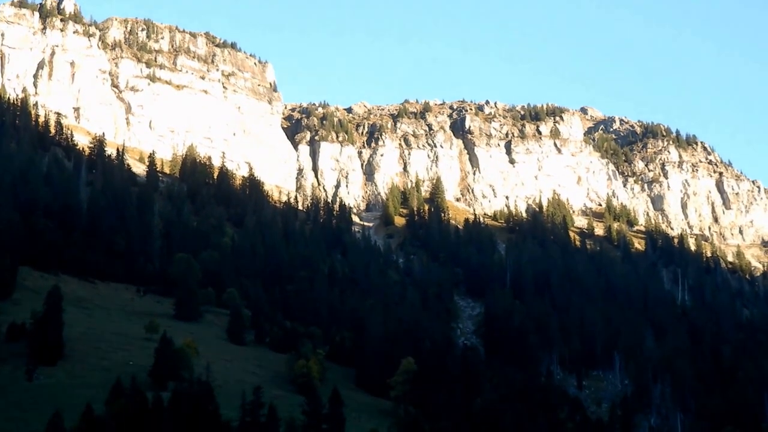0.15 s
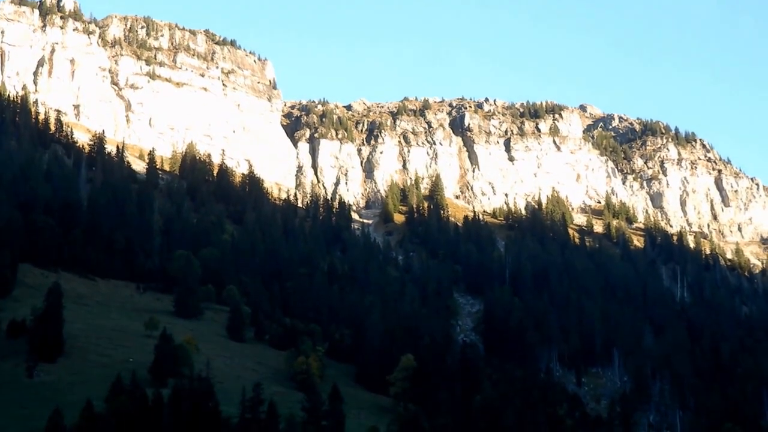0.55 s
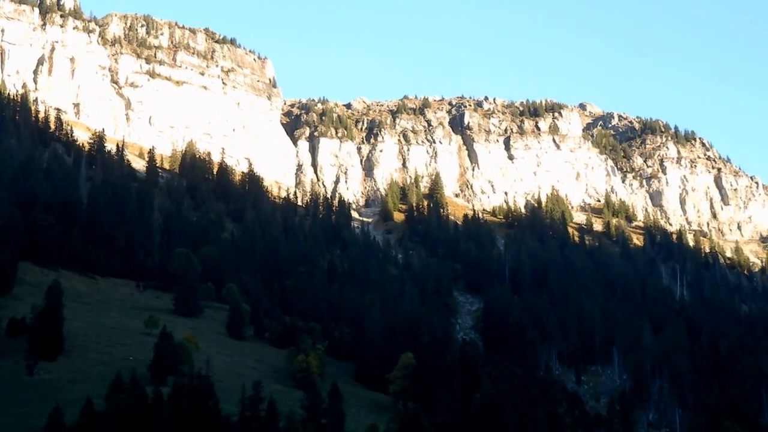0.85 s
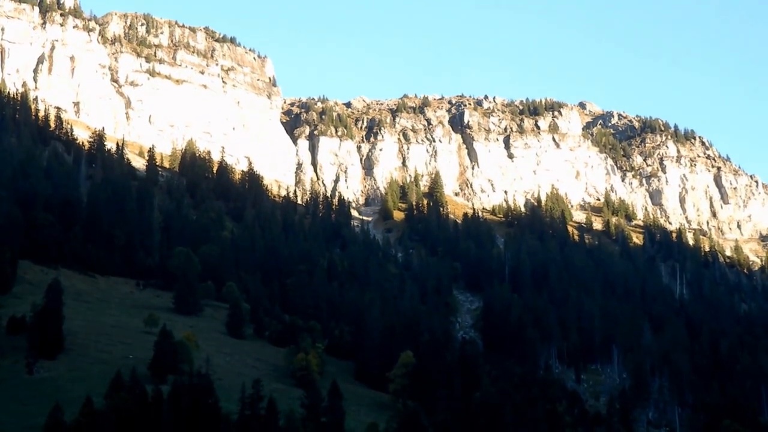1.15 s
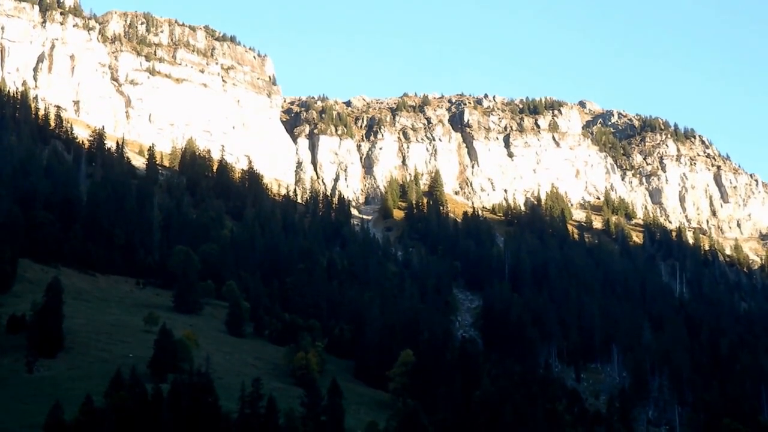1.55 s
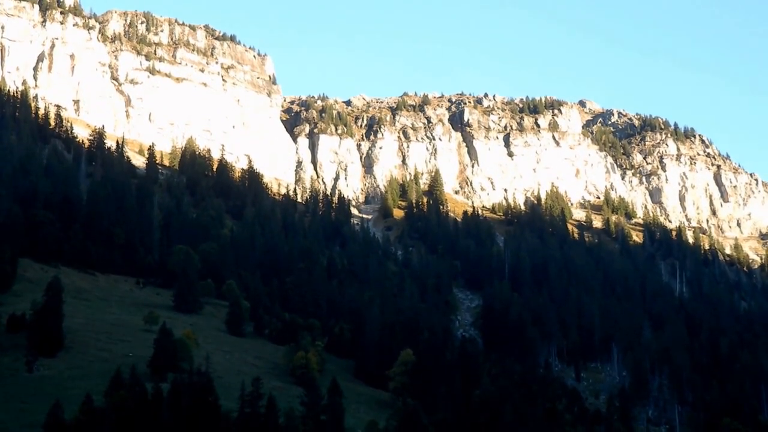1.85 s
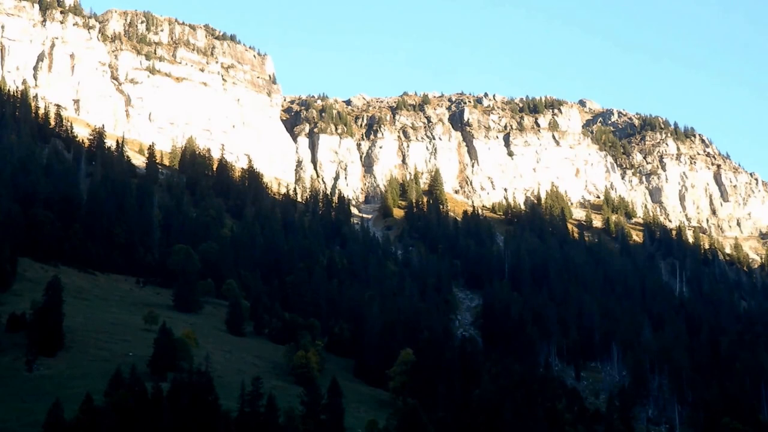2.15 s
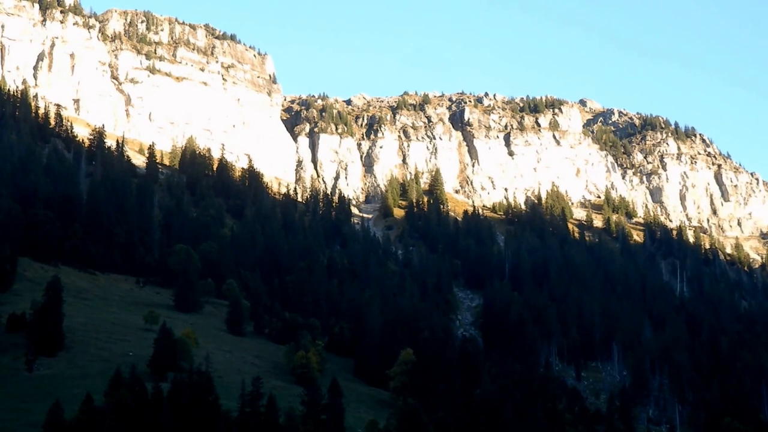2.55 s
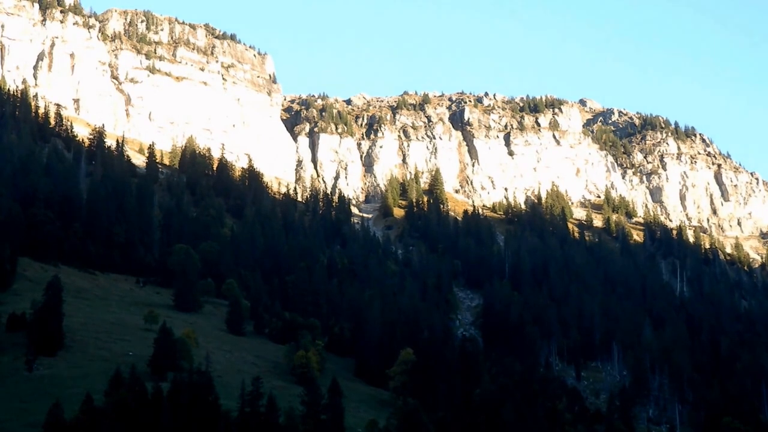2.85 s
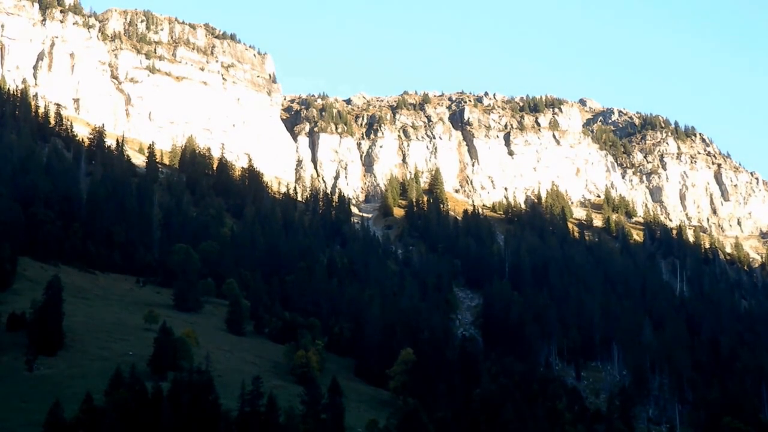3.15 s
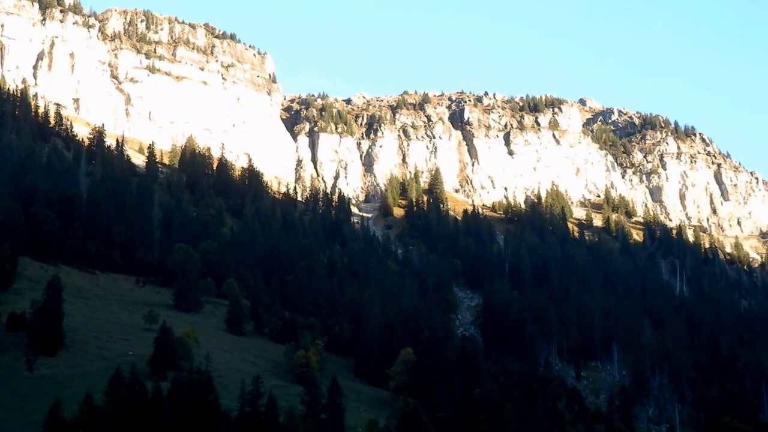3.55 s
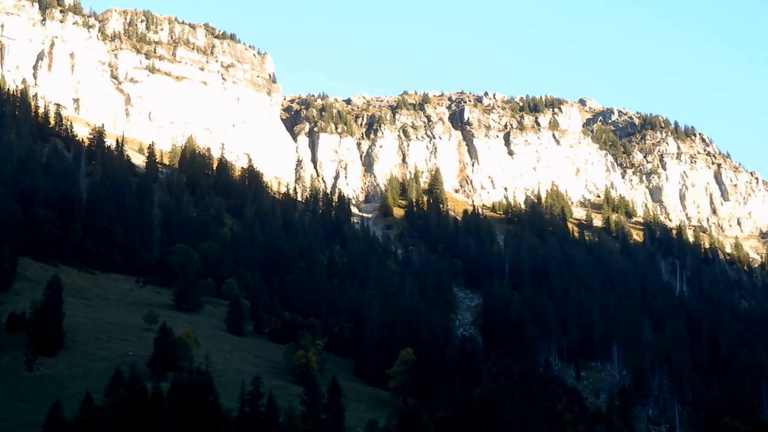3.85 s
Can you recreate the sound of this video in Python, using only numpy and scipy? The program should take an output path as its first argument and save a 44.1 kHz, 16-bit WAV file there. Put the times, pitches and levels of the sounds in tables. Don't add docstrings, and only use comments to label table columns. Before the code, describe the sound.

Wind buffeting a hand-held microphone, mostly on the right, with distant stags bellowing across a valley

```python
import sys
import numpy as np
from scipy import signal
from scipy.fft import rfft, irfft
from scipy.io import wavfile
from scipy.ndimage import uniform_filter1d

SR = 44100
rng = np.random.default_rng(int(sys.argv[2]) if len(sys.argv) > 2 else 0)


def to_wav(sig):
    pcm = np.clip(np.atleast_2d(sig), -1, 1) * 32767
    pcm = np.round(pcm).astype(np.int16)
    wavfile.write(sys.argv[1], SR, pcm.T)


def ratio_of_db(decibels):
    return 10 ** (np.asarray(decibels, float) / 20)


N = 176400


def curve(table, col):
    a = np.array(table, float)
    return np.interp(np.arange(N) / SR, a[:, 0], a[:, col])


def unit(x):
    return x / np.sqrt(np.mean(x ** 2) + 1e-30)


def colour(x, points):
    a = np.array(points, float)
    log_hz = np.log(np.arange(N // 2 + 1) * SR / N + 1)
    log_points = np.log(a[:, 0])
    outside = np.maximum(log_points[0] - log_hz, 0) + np.maximum(log_hz - log_points[-1], 0)
    gain_db = np.interp(log_hz, log_points, a[:, 1]) - 24.4 * outside
    return irfft(rfft(x) * ratio_of_db(gain_db), N)


def band(x, hz, width):
    return signal.lfilter(*signal.iirpeak(hz, hz / width, SR), x)


def above(x, hz):
    return irfft(rfft(x) * (np.arange(N // 2 + 1) * SR / N > hz), N)


def walk(rate):
    k = int(SR / rate)
    steps = np.repeat(rng.standard_normal(N // k + 1), k)
    return unit(uniform_filter1d(uniform_filter1d(steps, k), k)[:N])


def add(out, s, shape):
    i = int(s * SR) - len(shape) // 2
    a, b = max(i, 0), min(i + len(shape), N)
    out[a:b] += shape[a - i:b - i]


def bed(points, alike, flicker_db, swell_db):
    n = rng.standard_normal((3, N))
    swell = walk(3.02)
    noise = alike * n[0] + np.sqrt(1 - min(alike, .99) ** 2) * n[1:]
    spec = rfft(unit(colour(noise, points)))
    octave = np.log2(np.arange(N // 2 + 1) * SR / N + 1)
    lo, hi = int(np.log2(points[0][0])), int(np.log2(points[-1][0])) + 2
    out = 0
    for c in range(lo, hi):
        share = np.interp(octave, [c - 1, c, c + 1], [c == lo, 1, c == hi - 1])
        out = out + irfft(spec * share, N) * ratio_of_db(swell_db * swell + flicker_db * walk(9.0))
    return out


# frequency in Hz, level in dB per Hz.
HISS_COLOUR = [(1200, -7), (2000, -8.5), (2600, -9.5), (3600, -13.5), (5000, -13), (6400, -4), (10000, -4),
               (15600, -2)]


def hiss():
    return ratio_of_db(-58.5) * bed(HISS_COLOUR, alike=0.071, flicker_db=.2, swell_db=.3)


# frequency in Hz, level in dB.
SCAN_TONES = [
    (15734, -74),
    (7882, -88),
]


def scan_whine():
    t = np.arange(N) / SR
    return sum(ratio_of_db(db + 3.5) * np.sin(2 * np.pi * hz * t) for hz, db in SCAN_TONES)


# frequency in Hz, level in dB per Hz.
AIR_COLOUR = [(60, -7.5), (160, -4), (220, -4.5), (400, -4.5), (550, -10.5), (800, -20), (1300, -32),
              (2500, -42.5)]
# time in seconds, level in dB.
SLOPE_SWELL = [(0, 2.5), (1.4, 0.5), (1.6, -2), (2.1, 0.5), (2.9, 1.5), (3.3, -2.5), (4, 1)]


def valley_air():
    return ratio_of_db(-50 + curve(SLOPE_SWELL, 1)) * bed(AIR_COLOUR, alike=0.98, flicker_db=1.3, swell_db=.4)


# time in seconds, level in dB.
GRASS_RUSTLE = [(2.0, -77), (2.3, -60), (2.47, -59), (2.57, -57.5), (2.64, -55), (2.7, -59), (2.76, -57),
                (2.82, -61), (2.92, -65), (3.0, -75), (3.4, -62.5), (3.65, -68), (4, -65.5)]
# frequency in Hz, level in dB per Hz.
GRASS_COLOUR = [(700, -2.5), (1100, -2), (2000, -3.5), (3600, -10), (6500, -7.5), (10000, -14),
                (15000, -17)]


def grass():
    return bed(GRASS_COLOUR, alike=.4, flicker_db=1.2, swell_db=.3) * ratio_of_db(curve(GRASS_RUSTLE, 1))


# time in seconds, level in dB, pitch in Hz.
HOUSING_TICKS = [(0.194, -61, 6000), (1.389, -51, 950), (1.6624, -51, 2120), (1.663, -56.5, 6000),
                 (1.889, -60, 5800), (2.3105, -63, 7140), (2.3218, -44.5, 2150), (2.3227, -60.5, 5500),
                 (2.346, -60, 7000), (2.757, -58, 8000), (3.575, -61, 6030), (3.8833, -58.5, 7600),
                 (3.998, -47, 1800)]


def ticks():
    t60_s = 0.024
    out, t = np.zeros((2, N)), np.arange(-900, 900) / SR
    for s, db, hz in HOUSING_TICKS:
        n = rng.standard_normal((3, len(t)))
        burst = (n[0] + n[1:]) * (t > 0) * ratio_of_db(db + 6 - 60 * np.abs(t) / t60_s)
        y = 1.4 * band(band(burst, hz, .7 * hz), hz, 1.3 * hz)
        y = y - 0.6 * band(y, 4300, 1700)
        add(out[0], s, y[0])
        add(out[1], s, y[1])
    return out


# time in seconds, length in seconds, level in dB, pitch in Hz.
STAG_GRUNTS = [
    (.70, .05, -46, 158),
    (.82, .035, -53, 162),
    (.93, .03, -54, 156),
    (1.066, .035, -49, 160),
    (1.33, .04, -52, 140),
    (1.43, .055, -51, 138),
]


def grunts():
    out = np.zeros(N)
    for s, length, db, hz in STAG_GRUNTS:
        u = np.arange(-int(length * SR), int(length * SR)) / SR
        swell = np.exp(-2 * (u / length * 1.33) ** 2)
        add(out, s, ratio_of_db(db + 11.5) * swell * np.sin(2 * np.pi * hz * u * (1 - 0.15 * u)))
    return out


# time in seconds, pitch in Hz, level in dB,
# extra level in dB of the third resonance, which falls as the mouth opens.
FIRST_BELLOW = [(0, 82.76, -50, -1), (.08, 80.35, -43, -6), (.17, 80.7, -44, 7), (.25, 80.16, -46, -2),
                (.33, 75.6, -41.5, -2.5), (.44, 74.1, -43.5, -2.5), (.55, 70.37, -37.5, -13),
                (.66, 64.75, -39, -13), (.76, 62, -57, 12)]
SECOND_BELLOW = [(2.05, 66.88, -56, -4), (2.16, 68, -50, -0.5), (2.33, 66.9, -43, -5.5),
                 (2.5, 65.74, -45.5, 3), (2.62, 64.6, -41.5, -4), (2.72, 63.7, -40, -3),
                 (2.8, 63.1, -42.5, -10), (2.9, 61.8, -56, -9)]
# resonance in Hz, its width in Hz, level in dB.
FIRST_THROAT = [(156, 52, -10.5), (260, 87, -9), (404.5, 63, 4), (494, 74, -4.5)]
SECOND_THROAT = [(170, 56, -33), (341, 92, -5), (419.7, 55, 3.5), (536.5, 33, -4), (870, 115, -22),
                 (1243, 74, -19.5)]


def bellow(table, throat, rasp):
    t = np.arange(N) / SR
    cycles = np.cumsum(curve(table, 1) * (1 + .004 * walk(25))) / SR
    pulses = np.diff(np.floor(cycles), prepend=0) * ratio_of_db(2.0 * walk(60))
    puffs = np.exp(-(cycles % 1) / 0.24) * rng.standard_normal(N)
    source = unit(pulses) + rasp * unit(puffs)
    voice = 0
    for k, (hz, width, db) in enumerate(throat):
        ring = unit(band(band(source, hz, width), hz, width))
        mouth_db = curve(table, 3) if k == 2 else 0
        voice = voice + (-1) ** k * ratio_of_db(db + mouth_db) * ring
    start, end = table[0][0], table[-1][0]
    gate = np.clip((t - start + 0.022) / 0.018, 0, 1) * np.clip((end - t) / 0.022, 0, 1)
    return voice * ratio_of_db(curve(table, 2) - 5.5) * gate


def valley(x):
    t60_s, wet_db = .8, -9
    t = np.arange(SR) / SR
    n = rng.standard_normal((3, len(t)))
    tail = (n[0] + 0.086 * n[1:]) * ratio_of_db(-60 * t / t60_s) * (t > .015)
    tail = tail / np.sqrt(np.sum(tail[0] ** 2))
    return x + ratio_of_db(wet_db) * signal.fftconvolve(x[None], tail, axes=1)[:, :N]


def stags():
    first = bellow(FIRST_BELLOW, FIRST_THROAT, rasp=.3)
    second = bellow(SECOND_BELLOW, SECOND_THROAT, rasp=.5)
    return ratio_of_db(-2) * valley(first + second + grunts())


def eddy(hz, turn):
    sharp = 4.24
    u = np.arange(-int(2 * SR / hz), int(2 * SR / hz)) * hz / SR
    y = np.real(np.exp(2j * np.pi * turn) / (1 - 2j * np.pi * u / (sharp - 1)) ** sharp)
    return y * np.hanning(len(u))


def wind(big, level_db, hz):
    small, thumps, wake = np.zeros(N), np.zeros(N), np.zeros(N)
    for place, pitch, rarity, turn in rng.random((700, 4)):
        level = ratio_of_db(-np.log(rarity + 0.0081))
        add(small, place * N / SR, level * eddy(hz * np.exp(0.4 * 3 * (pitch - .5)), turn))
    wake_s = 0.025
    u = np.arange(-4000, 4000) / SR
    for s, db, f in big:
        add(thumps, s, ratio_of_db(db + 0.5) * eddy(f * 1.037, rng.random()))
        add(wake, s, ratio_of_db(db - 14) ** 2 * np.exp(-(u / wake_s) ** 2))
    out = thumps + unit(small) * np.sqrt(ratio_of_db(level_db) ** 2 + wake)
    limit = 1.6
    port_hz = [26.3, 424]
    port = signal.butter(2, port_hz, "band", fs=SR, output="sos")
    return signal.sosfiltfilt(port, limit * np.tanh(out / limit))


# time in seconds, level in dB.
LEFT_RUMBLE = [(0, -40), (.25, -41), (.45, -42.5), (1.3, -48), (1.82, -50), (1.92, -38.5), (2.3, -38),
               (2.75, -41), (2.95, -44), (3.3, -42), (3.5, -50), (3.82, -46), (3.95, -40)]
RIGHT_RUMBLE = [(0, -44), (.3, -36), (.45, -52.5), (.9, -48.5), (1.1, -59), (1.2, -41.5), (1.45, -35.5),
                (1.65, -44), (1.85, -44), (1.95, -38.5), (2.3, -33.5), (2.6, -31), (2.88, -47), (3.14, -52),
                (3.3, -38), (3.5, -33), (4, -34.5)]
# time in seconds, level in dB, pitch in Hz.
LEFT_HITS = [(0.073, -26, 50), (0.178, -30, 43), (0.285, -32, 43), (1.979, -44, 40), (2.015, -27, 58),
             (2.043, -28, 69), (2.196, -29, 59), (2.252, -22.5, 47), (2.406, -29.0, 40), (2.505, -30.5, 54),
             (2.631, -32.5, 40), (2.708, -31, 63), (3.111, -35, 43), (3.14, -28, 74), (3.276, -30, 40.3),
             (3.352, -26.5, 50), (3.868, -32, 40), (3.94, -33, 40), (3.963, -33.0, 40), (3.982, -30, 50)]
RIGHT_HITS = [(0.093, -15.5, 64.3), (0.11, -16.5, 46.6), (0.133, -20, 43), (0.178, -16.5, 43),
              (0.207, -14.5, 80), (0.362, -16.5, 51), (0.508, -23.5, 59.4), (0.606, -26, 54.2),
              (0.626, -28, 43), (0.807, -21, 108.2), (0.823, -22.5, 59), (0.84, -25, 53),
              (1.192, -23.5, 54), (1.219, -22.5, 43), (1.307, -19, 78), (1.33, -24, 54), (1.385, -15.5, 81),
              (1.4, -19.5, 74), (1.594, -23, 57), (1.901, -19.0, 57), (1.923, -14, 67), (1.967, -15, 58),
              (2.015, -9.5, 67), (2.034, -17.5, 106), (2.072, -19, 62.6), (2.177, -12, 64),
              (2.229, -10.5, 66), (2.277, -11, 78), (2.337, -14, 86), (2.396, -16, 57.5),
              (2.415, -13.5, 78.5), (2.464, -16, 101.5), (2.506, -15, 92), (2.532, -27, 59.3),
              (2.549, -13, 74.5), (2.564, -25, 63), (2.6, -16.5, 46.6), (2.616, -21, 69.1),
              (2.68, -20.5, 63), (2.725, -22, 78), (3.011, -17.5, 73), (3.029, -20.5, 46),
              (3.089, -11.5, 69.6), (3.184, -13.5, 79), (3.215, -16, 49.6), (3.253, -10.5, 63),
              (3.269, -19.5, 58), (3.319, -12.0, 65.6), (3.373, -16.5, 50.4), (3.402, -15.5, 55.7),
              (3.472, -17, 43), (3.618, -17, 83), (3.674, -13.5, 75.5), (3.704, -20, 54),
              (3.725, -1.5, 95.3), (3.741, -15, 53.3), (3.789, -15.5, 43), (3.931, -15, 49.6),
              (3.961, -15.5, 66), (3.983, -11, 86)]
# time in seconds, level in dB, pitch in Hz.
RIGHT_SLAPS = [(1.306, -26, 188), (1.425, -25, 146), (1.661, -30.5, 79.5), (1.704, -30, 97),
               (1.769, -29, 75), (2.033, -27.5, 198), (2.965, -26, 60), (3.089, -19.5, 191),
               (3.201, -21, 146), (3.536, -28, 150), (3.7246, -11.5, 181), (3.788, -18, 185),
               (.12, -20.5, 150), (2.164, -19.5, 135), (2.229, -20.5, 195), (2.268, -15.5, 181),
               (2.412, -22.5, 219), (2.515, -18.5, 216), (2.605, -20.5, 170), (3.391, -23.5, 139)]


def wind_on_ports():
    left = wind(LEFT_HITS, curve(LEFT_RUMBLE, 1), hz=43)
    right = wind(RIGHT_HITS + RIGHT_SLAPS, curve(RIGHT_RUMBLE, 1) + 5.5, hz=62)
    return np.array([left, right])


def scene():
    far = valley_air() + grass() + stags()
    far = np.array([np.roll(far[0], 5), far[1]])
    return far + ticks() + wind_on_ports()


# start in seconds, length in seconds.
FULL_TREBLE = [(0, .052), (.104, .047), (.182, .047), (.27, .31), (.611, .056), (.698, .11), (.842, .35),
               (1.231, .077), (1.421, .31), (1.786, .1), (2.083, .13), (2.23, .24), (2.51, .14),
               (2.683, .092), (2.81, .27), (3.11, .064), (3.224, .081), (3.34, .15), (3.56, .14),
               (3.791, .15)]


def uneven_treble(x):
    t = np.arange(N) / SR
    full = sum((t > s) * (t < s + length) * 1. for s, length in FULL_TREBLE)
    full = uniform_filter1d(full, size=700)
    dull = 1 - full
    treble = above(x, 4800)
    x = x - full * (1 - ratio_of_db(-4.5)) * (above(x, 3100) - treble)
    kept = ratio_of_db(-3.5)
    return x - dull * ((1 - kept) * treble + kept * above(x, 15100))


def roll_off(x):
    return signal.sosfilt(signal.butter(12, 15840, fs=SR, output="sos"), x)


def record(dry):
    x = dry + hiss() + scan_whine()
    x = x - above(x, 15830)
    return roll_off(uneven_treble(x))


dry = scene()
out = record(dry)
to_wav(out)
```